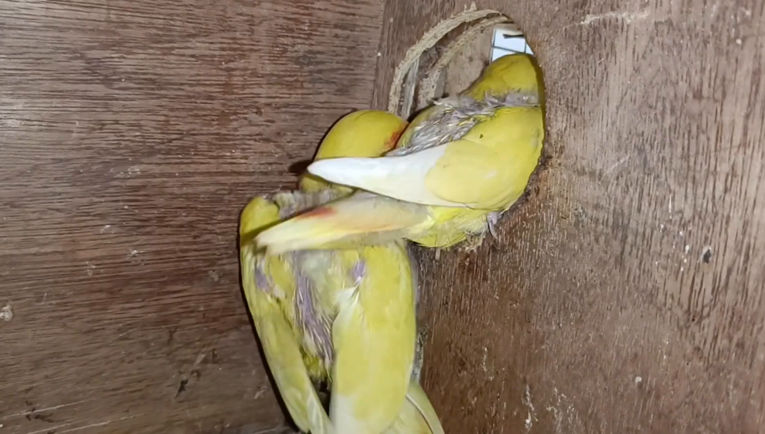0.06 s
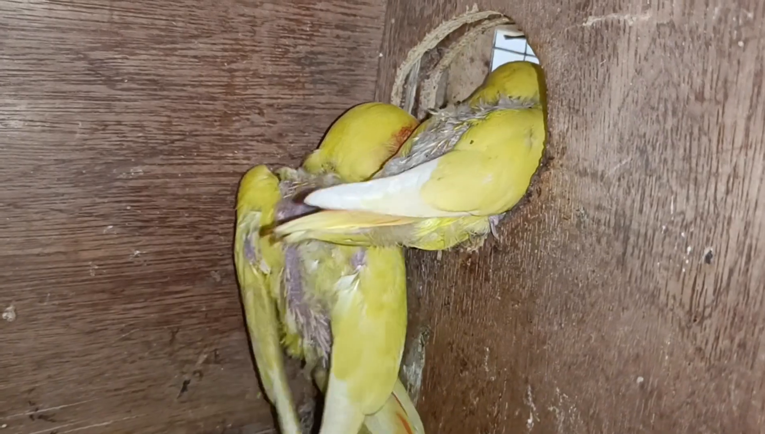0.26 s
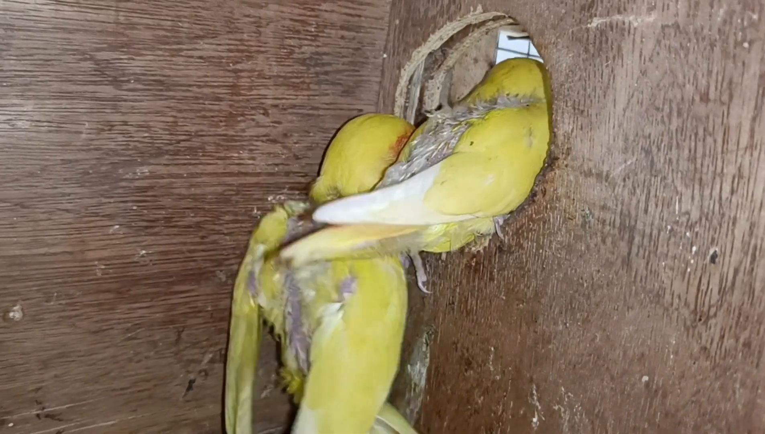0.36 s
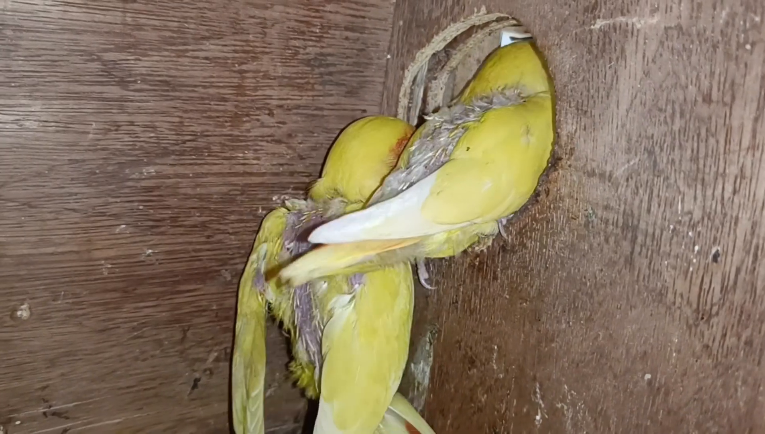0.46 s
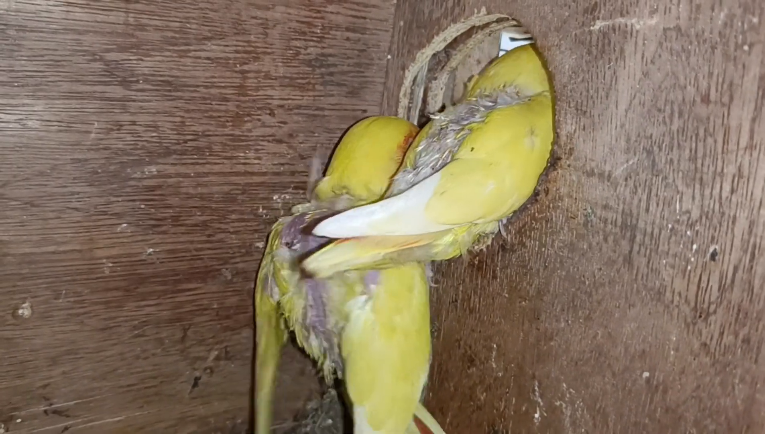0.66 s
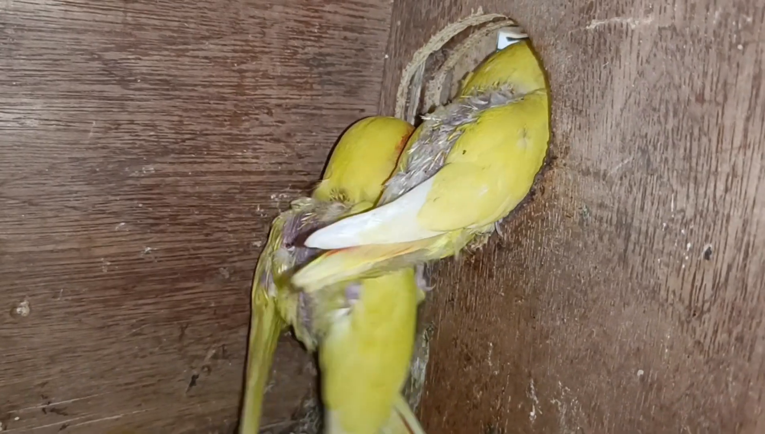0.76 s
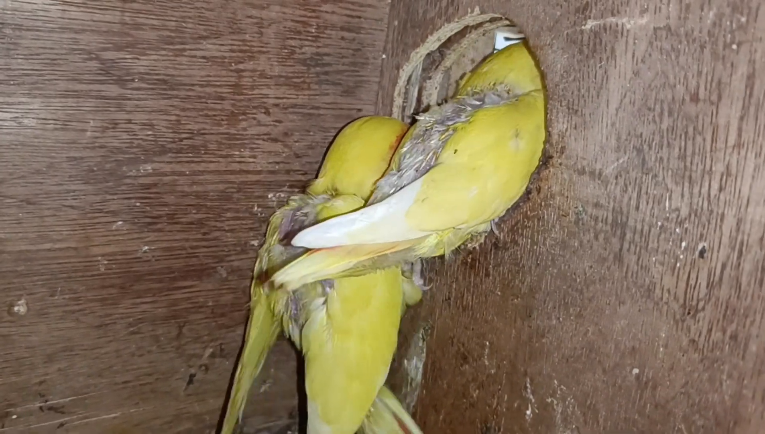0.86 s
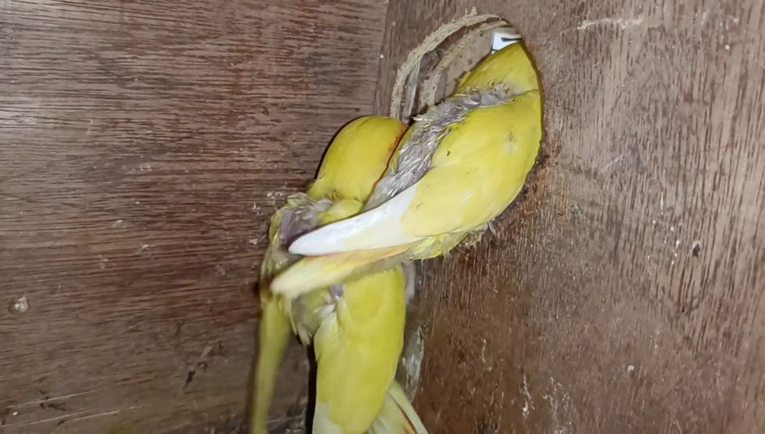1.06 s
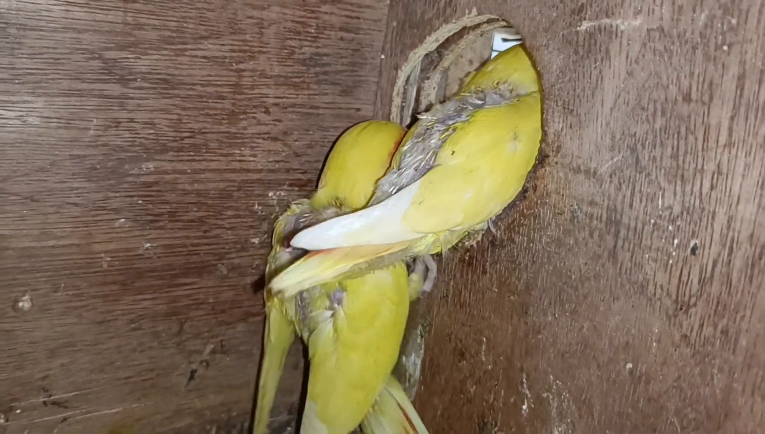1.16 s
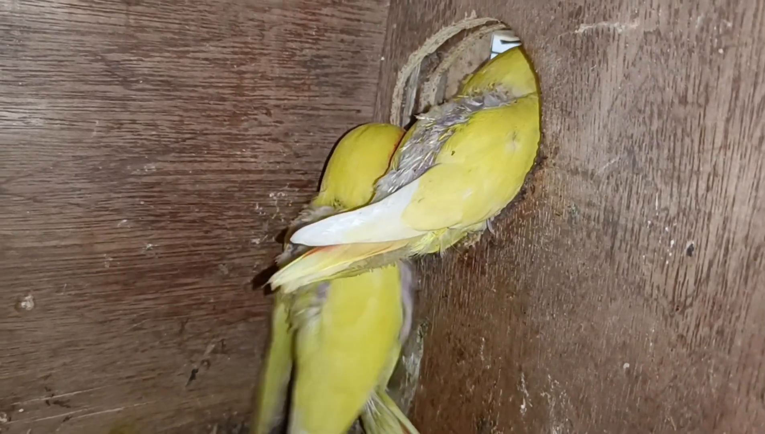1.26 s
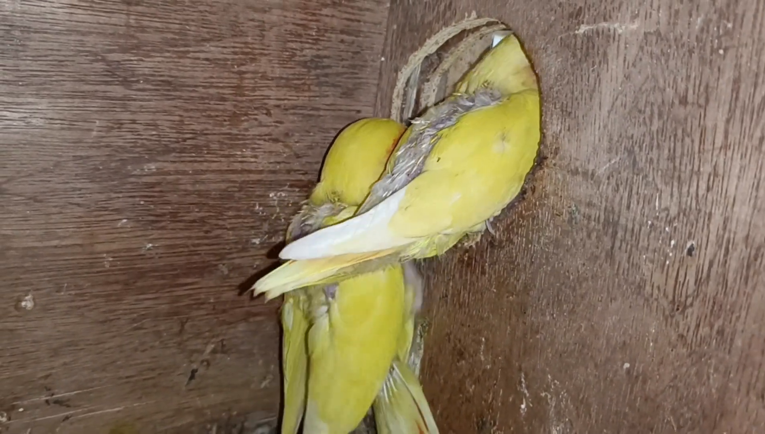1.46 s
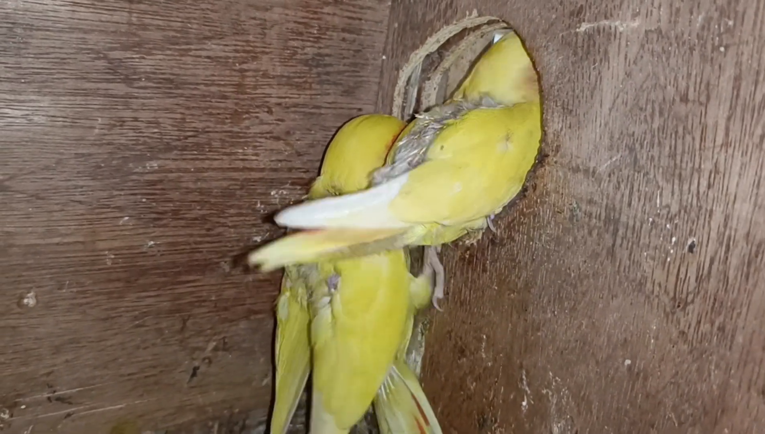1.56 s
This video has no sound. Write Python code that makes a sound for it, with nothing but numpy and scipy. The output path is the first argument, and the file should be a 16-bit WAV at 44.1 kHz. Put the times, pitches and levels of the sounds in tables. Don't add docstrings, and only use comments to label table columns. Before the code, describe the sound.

Lovebird screeches and flicked whistles, very near, first slightly to one side and then the other. A moderate screech comes first, then a loud overlapping burst with a rough, gurgling long cry, bright room echo and quiet hum.

```python
import sys
import numpy as np
from scipy import signal
from scipy.fft import rfft, irfft
from scipy.io import wavfile

SR = 44100
rng = np.random.default_rng(int(sys.argv[2]) if len(sys.argv) > 2 else 0)


def persist_wave(psi):
    counts = np.round(np.clip(psi, -1, 1) * 32767).astype(np.int16)
    wavfile.write(sys.argv[1], SR, np.atleast_2d(counts).T)


def voltage_ratio(level):
    return 10 ** (np.asarray(level, float) / 20)


N = 70560

# (frequency [Hz], density [dB per Hz])
HUM = [(25, -18.5), (60, -12.5), (115, -1), (190, -11.5), (260, -2), (330, -18.5), (800, -19.5),
       (12000, -58.5)]
# (time [s], level [dB])
SWELL = [(0, -2), (.3, -1), (0.499, 1.5), (.7, 5.5), (.95, -3), (1.08, 3), (1.251, -1), (1.6, -1.5)]
# (frequency [Hz], share [0-1])
ALIKE = [(60, 0.92), (150, 1), (300, 0.43), (800, 0.18), (5000, 0.1)]
# (frequency [Hz], t60 [s])
DECAY = [(1000, 0.29), (2000, 1.53), (4000, 1.03), (6000, 0.95), (8000, 0.82), (12000, 0.63)]
# (start [s], length [s], scratches [per s], level [dB])
SCUFFLE = (.17, .068, 1500, -37)
# (frequency [Hz], t60 [s])
WOOD = [(850, 0.019), (1150, 0.021), (1400, 0.02)]
# (time [s], pitch [Hz], level [dB], length [s])
PIPS = [
    (.641, 3600, -18.5, 0.0025),
    (0.642, 7500, -15.5, 0.00059),
    (0.677, 3637, -12, 0.0049),
    (0.702, 1610, -30.5, 0.0031),
    (0.795, 1063, -33.5, 0.0048),
    (.921, 1610, -24.5, 0.0026),
    (1.045, 1556, -25, 0.0039),
]
# (time [s], pitch [Hz], level [dB])
GURGLE = [(.993, 3480, -17), (1.0, 3620, -20), (1.0075, 3660, -14.5), (1.015, 3580, -12.5),
          (1.0225, 3460, -24), (1.031, 3550, -20), (1.037, 3320, -22), (1.045, 3250, -20),
          (1.054, 3220, -29.5), (1.062, 3090, -25.5), (1.07, 3050, -20), (1.077, 3150, -24)]
# (time [s], change [dB])
THROBS = [(0.744, 4), (0.747, -12), (0.754, 13), (0.761, -6), (0.766, 3), (0.774, 5.5), (0.778, -1),
          (.781, 7), (.788, -2), (0.796, 5), (.811, 1), (0.818, -1), (0.822, 8), (0.945, -1), (0.953, 6),
          (.962, 3), (0.974, -11), (0.982, 6), (0.9892, 4.5), (.992, -4), (0.997, 1.5), (1.012, -5),
          (1.02, 0.5), (1.041, 4.5), (1.072, 1)]
# (frequency [Hz], density [dB per Hz])
BREATH = [(600, -24), (1500, -18.5), (2300, -4.5), (3300, 1.5), (4500, 1), (6500, -1), (9000, -8),
          (15000, -28.5)]

# (time [s], pitch [Hz], level [dB])
FADING = [(0, 3043, -45.5), (.08, 3010, -41), (.2, 2934, -52)]
FAR = [(.172, 1662, -38), (.2, 1675, -29.5), (.24, 1630, -32), (.29, 1657, -37.5), (.37, 1627, -54)]
SCREECH = [(.438, 2856, -25), (.474, 3060, -30), (.482, 3380, -24), (.49, 3420, -23), (.52, 3290, -24),
           (.545, 3380, -26.5), (.555, 3290, -24.5), (.57, 3180, -25), (.578, 3100, -32)]
LOW_VOICE = [(.455, 1552, -35), (.478, 1686, -35), (.488, 2002, -25.5), (.52, 1916, -30.5),
             (.55, 1974, -28), (.572, 1890, -40)]
LOW_FALL = [(.574, 2050, -31), (.582, 1915, -30), (.59, 1700, -27.5), (.6, 1498, -34), (.614, 1390, -39)]
SQUEAK = [(.858, 3930, -21), (.867, 4143, -17), (.876, 4020, -27)]
DRONE = [(.645, 2800, -27.5), (.66, 2800, -26.5), (.69, 2810, -26.5), (.7, 2820, -31), (.72, 2823, -35),
         (.82, 2889, -40.5), (.85, 2930, -44), (.87, 2950, -26)]
WHISTLE_A = [(.669, 3923, -8), (.675, 3737, -14.5), (.687, 3620, -2.5), (.6925, 4540, -13),
             (.6945, 3835, -13), (.699, 3520, -8.5)]
RASP = [(.698, 3342, -12), (.72, 3407, -19), (.76, 3372, -28), (.8, 3373, -25.5), (.84, 3330, -41)]
MIDDLE = [(0.699, 3690, -47), (0.741, 3723, -40), (.76, 3664, -27.5), (.82, 3793, -26.5),
          (.84, 3920, -15.5), (.848, 3893, -17), (.853, 3690, -8.5), (0.861, 3120, -36)]
CHIRP_A = [(.803, 1513, -34.5), (.83, 1414, -36.5), (.85, 1751, -28.5), (.857, 1904, -26),
           (.864, 2080, -25), (.878, 2050, -34)]
WHISTLE_B = [(.878, 4022, -32), (.89, 3930, -9), (.907, 3887, -12.5), (.9105, 5386, -17),
             (.9135, 5400, -15), (.917, 3745, -16), (.928, 2837, -25.5)]
LONG_LOW = [(0.919, 3889, -17.5), (0.943, 3930, -10.5), (0.951, 3930, -21.5), (.98, 3860, -24.5),
            (1.009, 3910, -23.5), (1.071, 4030, -23), (1.12, 3987, -39)]
LONG = [(.945, 4010, -18), (.965, 4060, -16), (.98, 4200, -15), (1.021, 4240, -17.5), (1.05, 4200, -18.5),
        (1.057, 4060, -19), (1.067, 4260, -19), (1.089, 4150, -23), (1.118, 4050, -24)]
CHIRP_B = [(1.045, 1400, -26), (1.07, 1420, -33), (1.083, 1499, -24.5), (1.092, 1791, -23),
           (1.1, 1979, -15), (1.128, 1894, -22.5)]
# (path, overtone levels [dB], pitch wobble [share], rasp depth [0-1], rasp rate [Hz], breath [dB],
# left minus right [dB], room send [dB])
VOICES = [(FADING, [0, -5, -12.5], 0.014, 0.33, 140, -10, 0.0, -3.5), (FAR, [-17, -6, -7.5, -2, -16, -28],
          0.011, 0.44, 95, 2, -2.5, 0.0), (SCREECH, [2.5, -2.5, -18, -34],
          0.0059, 0.29, 79, -6.5, 4.2, -5.5), (LOW_VOICE, [0, -5, -25], 0.011, 0.5, 180, 0, 0.0, -6),
          (LOW_FALL, [-1, 5.5, -1, -14], 0.0091, 0.43, 200, -1, 0.0, -6), (DRONE, [2.5, 1, -4.5, -16.5],
          0.0222, 0.54, 91, 1.7, 0.0, 0.0), (WHISTLE_A, [0], 0.0018, 0.097, 190, -21.5, 3.2, -8),
          (RASP, [-22, 1, -36, -16.5], 0.018, 1, 370, -26, 0.0, 0.0), (MIDDLE, [0, -8],
          0.035, 0.74, 114, -3.3, 0.0, 0.0), (CHIRP_A, [0, 4, 2, 0, 3], 0.011, 0.44, 250, 1.8, 0.0, -7),
          (SQUEAK, [0, -16], .006, 0.48, 240, -16, 0.0, -5), (WHISTLE_B, [0, -7],
          0.004, 0.037, 145, -20.5, 0.0, -2), (LONG_LOW, [0, -10.5], 0.0075, 0.59, 76, -20.5, 0.0, 0.0),
          (LONG, [0.21, -2.76, -32], 0.009, 0.65, 172, -10, 0.0, 0.0),
          (CHIRP_B, [-5.5, 0.5, 1.5, 1.5, -6.5, -9.5, -7], 0.004, 0.43, 170, -10.5, 0.0, -8)]
# (multiple of high voice [1], multiple of low voice [1], level [dB])
MIXING = [
    (1, 1, -3),
    (2, -2, -3.5),
    (2, -1, -20),
]
# (time [s], port lag before [samples], port lag after [samples])
SIDE_CHANGE = (.78, 3.41, -1.54)
# (frequency [Hz], left minus right [dB])
PORTS = [(100, 0.5), (400, 1), (1500, 4.5), (3000, 0), (4300, -6), (6600, -19), (8400, 15), (12500, -10.5)]

HUM_DB = -39
ROOM_DB, ROOM_BUILD_S = -4.5, 0.0045
GURGLE_PULSE_S, GURGLE_OCTAVE_DB = 0.0019, -0.5
THROB_S = 0.0023
ATTACK_S, RELEASE_S = 0.0039, 0.0021
LONG_MIX_DB = -5
CEILING = .86

t = np.arange(N) / SR


def unit(x):
    return x / np.sqrt(np.mean(x ** 2) + 1e-20)


def at_hz(points, hz):
    table_hz, values = np.transpose(points)
    return np.interp(np.log(np.maximum(hz, 1)), np.log(table_hz), values)


def shaped(x, gain):
    size = x.shape[-1]
    return irfft(rfft(x) * gain(np.arange(size // 2 + 1) * SR / size), size)


def hum():
    def part(sign):
        return shaped(rng.standard_normal(N), lambda f: voltage_ratio(at_hz(HUM, f)) * np.sqrt(1 + sign * at_hz(ALIKE, f)))

    mid, side = part(1), part(-1)
    s, db = np.transpose(SWELL)
    return voltage_ratio(HUM_DB + np.interp(t, s, db)) * unit(np.array([mid + side, mid - side]))


def room(x):
    edges = 500 * 2 ** np.arange(0, 5.1, .5)
    tail = np.zeros((2, N))
    for a, b in zip(edges, edges[1:]):
        band = signal.butter(2, [a, b], "band", fs=SR, output="sos")
        noise = signal.sosfilt(band, rng.standard_normal((2, N)))
        tail += noise * voltage_ratio(-60 * t / at_hz(DECAY, np.sqrt(a * b)))
    tail = tail * (1 - np.exp(-t / ROOM_BUILD_S))
    return voltage_ratio(ROOM_DB) * signal.fftconvolve(x[None], unit(tail) / np.sqrt(N), axes=1)[:, :N]


def scuffle():
    start, length, rate, db = SCUFFLE
    bump = np.sqrt(np.abs(np.sin(np.pi * np.clip((t - start) / length, 0, 1))))
    out = np.zeros(N)
    for hz, t60 in WOOD:
        r, w = voltage_ratio(-60 / (t60 * SR)), 2 * np.pi * hz / SR
        clicks = (rng.random(N) < rate / SR) * rng.standard_normal(N)
        out += signal.lfilter([0, np.sin(w)], [1, -2 * r * np.cos(w), r * r], clicks * bump + 1e-18)
    return voltage_ratio(db) * out / 2


def pips():
    return sum(voltage_ratio(db) * np.exp(-((t - s) / length) ** 2) * np.sin(2 * np.pi * hz * t)
               for s, hz, db, length in PIPS)


def gurgle():
    out = np.zeros(N)
    for s, hz, db in GURGLE:
        phase = 2 * np.pi * hz * (t - s)
        tone = np.cos(phase) + voltage_ratio(GURGLE_OCTAVE_DB) * np.cos(2 * phase)
        out += voltage_ratio(db) * np.exp(-((t - s) / GURGLE_PULSE_S) ** 2) * tone
    return out


def throb():
    return voltage_ratio(sum(db * np.exp(-((t - s) / THROB_S) ** 2) for s, db in THROBS))


def flutter(rate_hz):
    return unit(shaped(rng.standard_normal(N), lambda f: f / rate_hz / (1 + (f / rate_hz) ** 3)))


def path(rows):
    s, hz, db = np.transpose(rows)
    attack = np.clip((t - s[0]) / ATTACK_S, 0, 1)
    release = np.clip((s[-1] - t) / RELEASE_S + 1, 0, 1)
    return np.interp(t, s, hz), attack * release * voltage_ratio(np.interp(t, s, db))


def voice(rows, overtones_db, wobble, rasp, rasp_hz, breath_db):
    hz, gain = path(rows)
    phase = 2 * np.pi * np.cumsum(hz * (1 + wobble * flutter(rasp_hz * 0.536))) / SR
    beat = flutter(rasp_hz)
    tone = np.zeros(N)
    for k, db in enumerate(overtones_db):
        rough = np.maximum(1 + rasp * (0.42 * beat + 0.61 * flutter(rasp_hz)), 0)
        tone += voltage_ratio(db) * np.sin((k + 1) * phase + k) * rough
    tone *= np.sqrt(2 / (1 + rasp ** 2))
    breath = unit(shaped(rng.standard_normal(N), lambda f: voltage_ratio(at_hz(BREATH, f))))
    breath *= np.maximum(1 + .5 * rasp * beat, 0)
    return gain * (tone + voltage_ratio(breath_db) * breath), phase, gain


def birds():
    change_s, lag_before, lag_after = SIDE_CHANGE
    near, sent, made = np.zeros((2, N)), np.zeros(N), []
    for rows, *traits, pan_db, room_db in VOICES:
        x, phase, gain = voice(rows, *traits)
        made.append((phase, gain))
        if rows == LOW_VOICE:
            (high, high_gain), (low, low_gain) = made[-2:]
            mixed = sum(voltage_ratio(db) * np.sin(a * high + b * low) for a, b, db in MIXING)
            x = x + np.sqrt(high_gain * low_gain) * mixed
        if rows == LONG:
            (low, low_gain), (high, high_gain) = made[-2:]
            x = x + voltage_ratio(LONG_MIX_DB) * np.sqrt(2 * high_gain * low_gain) * np.sin(2 * high - low)
        if rows in (RASP, MIDDLE, LONG_LOW, LONG):
            x = x * throb()
        if rows == LONG:
            x = x + gurgle()
        lag = lag_before if rows[0][0] < change_s else lag_after

        def turn(f):
            return np.exp(-1j * np.pi * f * lag / SR) * voltage_ratio(pan_db / 2)

        near += [shaped(x, turn), shaped(x, lambda f: 1 / turn(f))]
        sent += x * voltage_ratio(room_db)
    return near, sent


def scene():
    near, sent = birds()
    return hum() + room(sent) + scuffle() + pips() + near


def top_cut(x):
    return signal.sosfilt(signal.butter(12, 15750, fs=SR, output="sos"), x)


def record(dry):
    left = shaped(dry[0], lambda f: voltage_ratio(at_hz(PORTS, f) / 2))
    right = shaped(dry[1], lambda f: voltage_ratio(-at_hz(PORTS, f) / 2))
    x = np.array([left, right])
    return top_cut(CEILING * np.tanh(x / CEILING))


dry = scene()
out = record(dry)
persist_wave(out)
```